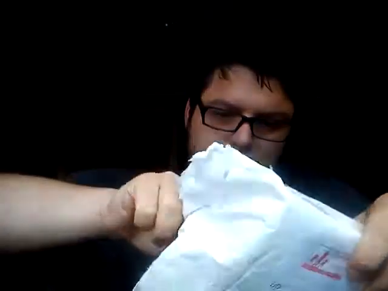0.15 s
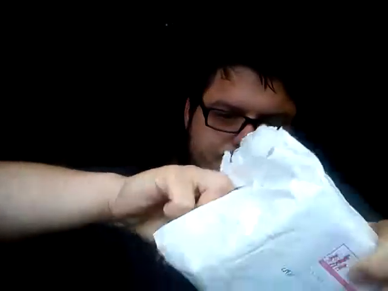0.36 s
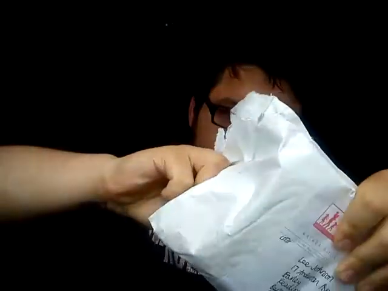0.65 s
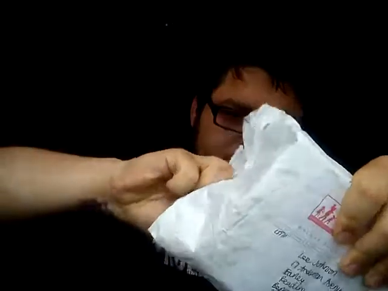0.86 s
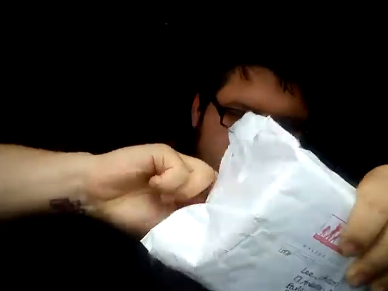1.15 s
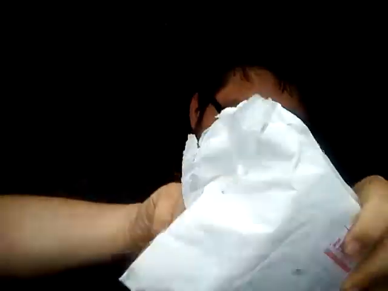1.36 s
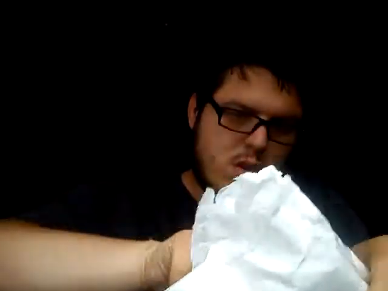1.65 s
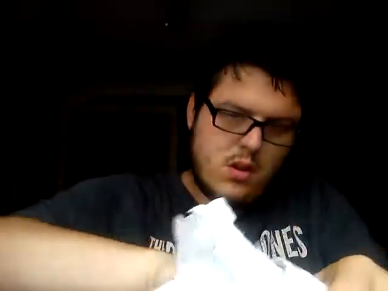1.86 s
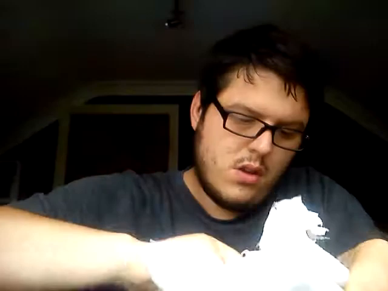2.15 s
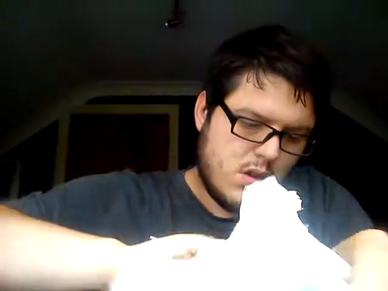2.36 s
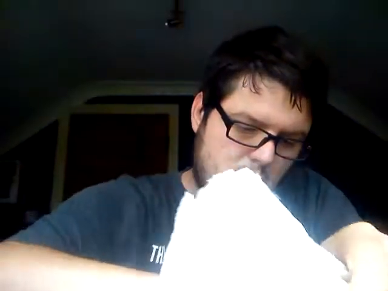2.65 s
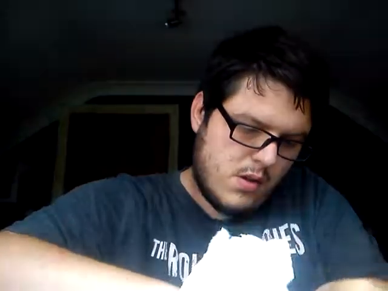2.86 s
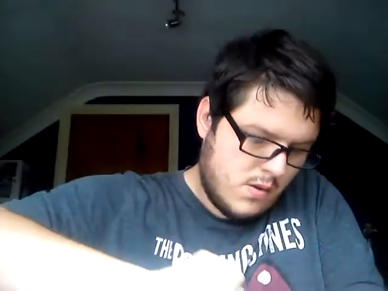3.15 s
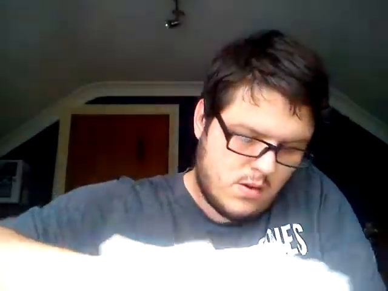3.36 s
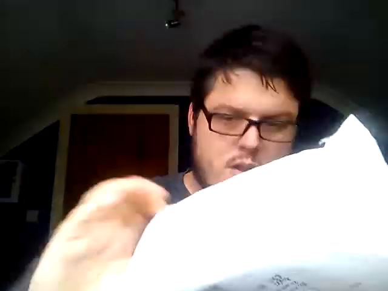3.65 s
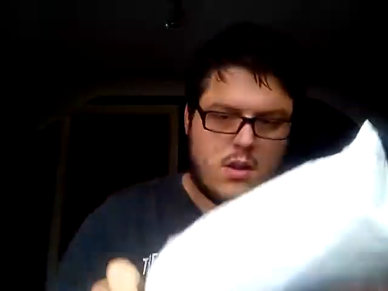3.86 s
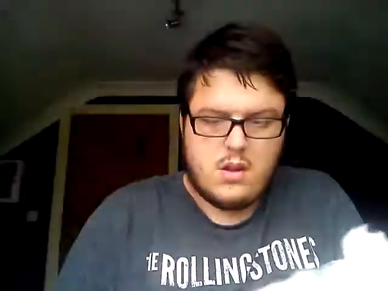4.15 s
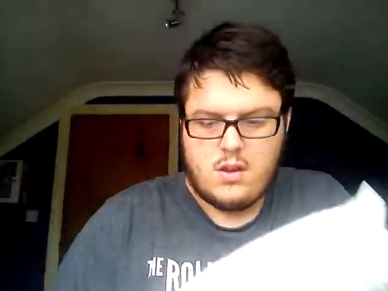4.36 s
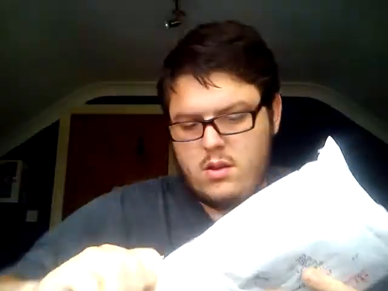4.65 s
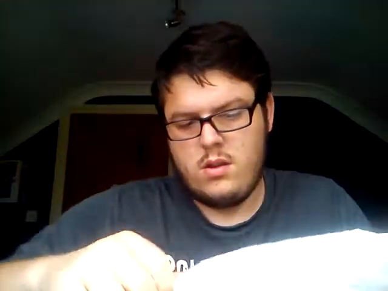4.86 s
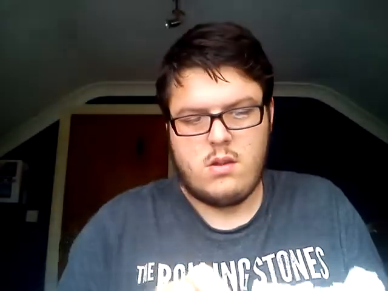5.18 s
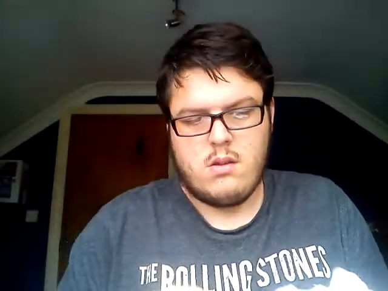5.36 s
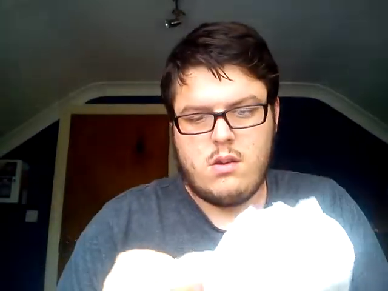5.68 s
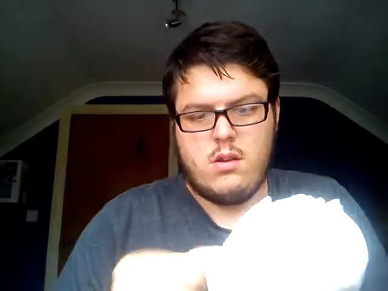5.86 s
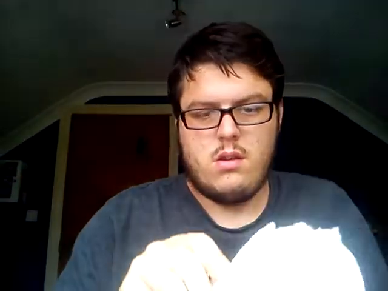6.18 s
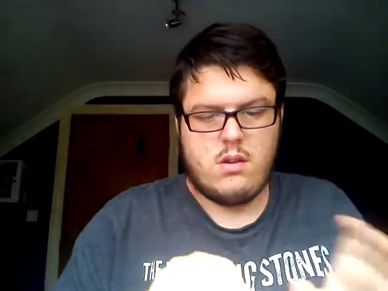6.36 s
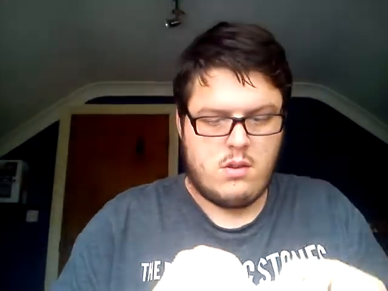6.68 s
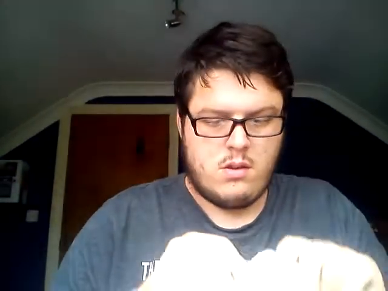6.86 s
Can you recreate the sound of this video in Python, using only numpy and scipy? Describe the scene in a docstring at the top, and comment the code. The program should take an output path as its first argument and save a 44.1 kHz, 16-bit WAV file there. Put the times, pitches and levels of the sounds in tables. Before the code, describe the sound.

A stiff paper envelope is handled and torn very close to a small microphone in a small, fairly dry room with a faint low noise bed. From 0 s, sheets slide and crinkle in short uneven strokes, bright fibre hiss over a hollow pouch-like rustle. A short jerky rip at 0.8 s brings a couple of pops; a firmer snap follows at 1.3 s. From 1.9 s a rip grows, ending in two loud, almost joined snaps at 2.1 s. Busy rustling with small crackles and soft low bumps fills 2.3 to 4.3 s. Two tiny rips at 4.5 s crackle sharply. Looser crumpling continues, with a dull bump at 5.5 s, and gets sparse and quiet after 6.2 s. At 6.9 s a hard tug releases a rapid cluster of the loudest snaps, within about a tenth of a second, then the hands settle.

```python
"""Hands tear open a stiff paper envelope close to a small microphone in a small room, over a low background noise.
From the start, sheets slide by stick and slip: noise grains coloured by the paper and by the hollow pouch.
Creases buckle throughout, each with a burst of fibre cracks and a damped pop; soft bumps are low decaying sines.
Short rips, jerky friction on taut paper, come early, then before a pair of loud snaps, then twice in mid-scene.
A last hard tug sets off a quick run of loud snaps, and the hands come to rest."""
import sys
import numpy as np
from scipy import signal
from scipy.fft import rfft, irfft
from scipy.io import wavfile

SR = 44100
rng = np.random.default_rng(int(sys.argv[2]) if len(sys.argv) > 2 else 0)


def waveform_to_disk(signal):
    """Save audio, clipped to [-1, 1], as 16-bit WAV at the path in sys.argv[1]."""
    frames = np.transpose(np.atleast_2d(signal))
    scaled = np.clip(frames, -1, 1) * 32767
    samples = np.round(scaled).astype(np.int16)
    wavfile.write(sys.argv[1], SR, samples)


N = 309582


def from_db(db):
    """Decibel law: 20 dB is a tenfold amplitude."""
    return 10 ** (np.asarray(db) / 20)


def rms_one(x):
    """Normalisation to unit root-mean-square amplitude."""
    return x / np.sqrt(np.mean(x ** 2) + 1e-20)


def at_hz(points, hz):
    """Interpolation of a table along a logarithmic frequency axis."""
    table = np.array(points)
    return np.interp(np.log(np.maximum(hz, 1)), np.log(table[:, 0]), table[:, 1])


def over_time(points, t):
    """Linear interpolation of a table along time."""
    return np.interp(t, *np.transpose(points))


def cut(x, hz, kind, order=2):
    """Butterworth filtering: a maximally flat passband."""
    sections = signal.butter(order, hz, kind, fs=SR, output="sos")
    return signal.sosfilt(sections, x + 1e-18)


def colour(x, spectrum, size=4096):
    """Minimum-phase filtering: a folded cepstrum gives the spectrum with nothing sounding early."""
    bins_hz = np.arange(size // 2 + 1) * SR / size
    cepstrum = irfft(np.log(from_db(at_hz(spectrum, bins_hz))))
    cepstrum[1:size // 2] *= 2
    cepstrum[size // 2 + 1:] = 0
    impulse = irfft(np.exp(rfft(cepstrum)))
    return signal.fftconvolve(x, impulse)[:len(x)]


def drift(rate):
    """Band-limited chance: interpolated random values, `rate` new ones a second, with unit RMS."""
    steps = rng.standard_normal(N // 8)
    return rms_one(np.interp(np.arange(N) / SR * rate, np.arange(len(steps)), steps))


def grains(per_s, spread_db):
    """Shot noise: random clicks of either sign, many small and a few large."""
    sizes = from_db(spread_db * np.minimum(rng.exponential(1, N), 3)) * rng.choice([-1, 1], N)
    return rms_one(sizes * (rng.random(N) < per_s / SR))


def add(out, s, sound):
    """Superposition of a sound onto the output from time s."""
    start = int(s * SR)
    out[start:start + len(sound)] += sound[:N - start]


# background noise spectrum: (frequency [Hz], relative density [dB per Hz])
FLOOR = [(20, -52), (45, -1), (75, -3.5), (130, -2.5), (200, -6.5), (400, -21.5), (950, -7.5), (1600, -28),
         (4000, -24.5), (16000, -33)]


def background(level_db=-60.5):
    """Stationary noise: Gaussian noise shaped by a fixed spectrum."""
    return from_db(level_db) * rms_one(colour(rng.standard_normal(N), FLOOR))


# reverberation time of the room: (frequency [Hz], decay by 60 dB [s])
ROOM = [(150, 0.31), (500, 0.25), (2000, 0.13), (6000, 0.14), (16000, 0.096)]


def room(x, wet_db=-14.0, first_s=0.0042, size=16384):
    """Reverberation: reflections from the desk and near walls decay exponentially, each octave at its own rate."""
    t, tail = np.arange(size) / SR, 0
    white = rng.standard_normal((2, size))
    edges_hz = 75 * 2. ** np.arange(9)
    for k, (low, high) in enumerate(zip(edges_hz, edges_hz[1:])):
        decay = from_db(-60 * t / at_hz(ROOM, np.sqrt(low * high)))
        tail = tail + cut(white[k % 2], [low, high], "band") * decay  # neighbouring octaves use separate noise
    tail = tail * np.clip(t / first_s - 1, 0, 1)  # silent until the first reflection
    return x + from_db(wet_db) * signal.fftconvolve(x, rms_one(tail) / np.sqrt(size))[:N]


# soft bumps of hands and packet: (time [s], envelope peak [dB], frequency [Hz])
BUMPS = [(0.471, -49, 157), (1.316, -34.5, 221), (1.336, -47, 90.5), (1.463, -47, 205),
         (2.101, -50.5, 70.4), (2.517, -46, 150), (2.607, -44, 93), (3.032, -44, 150), (5.515, -36, 205),
         (6.669, -50.5, 169)]


def bumps(swell_s=0.0045, size=6000):
    """Damped oscillation: a soft contact swells and dies in a few low cycles."""
    out, t = np.zeros(N), np.arange(size) / SR
    envelope = t / swell_s * np.exp(1 - t / swell_s)
    for s, db, hz in BUMPS:
        add(out, s, from_db(db) * envelope * np.sin(2 * np.pi * hz * t))
    return out


def gesture(t, start, length, attack_s, release_s, build_db=0):
    """Exponential onset and release: a movement takes hold, changes by build_db to its end, then lets go."""
    since = np.maximum(t - start, 0)
    hold = from_db(build_db * (np.minimum(since / length, 1) - 1))
    release = np.exp(-np.maximum(since - length, 0) / release_s)
    return (1 - np.exp(-since / attack_s)) * hold * release


# All friction and flexing levels below are relative; brightness is fibre hiss over sheet rasp.
# the envelope stirs even when merely held, until the hands come to rest: (time [s], friction [dB])
HELD = [(0, -59), (1.1, -62), (2.3, -59.5), (4.1, -65.5), (5, -62), (6.3, -61.5), (6.5, -71), (7, -74)]
# sheet sliding on sheet: (start [s], length [s], friction [dB], brightness [dB], flexing [dB])
STROKES = [(0.07, 0.18, -55, 7, -60), (0.225, 0.12, -52, 4, -57), (0.376, 0.12, -52, 7.5, -60),
           (0.535, 0.1, -49.5, 2.5, -50), (0.645, 0.21, -55.5, 4, -70), (1.158, 0.14, -53.5, 8, -53.5),
           (1.305, 0.037, -48.5, 6, -44.5), (1.446, 0.089, -55, 10, -57.5), (1.585, 0.025, -52, -2, -49),
           (1.748, 0.056, -50, 3, -48), (1.812, 0.035, -41, -0.5, -41.5), (2.34, 0.12, -53, 4.5, -54.5),
           (2.5, .025, -48, 1, -58), (2.594, 0.11, -44.5, -1.5, -43), (2.733, .11, -49.5, 3.5, -52.5),
           (2.851, 0.025, -40.5, 4, -43), (2.917, 0.062, -47, 11, -50), (3.01, .05, -42, 3, -43),
           (3.081, 0.084, -50.5, 1, -55), (3.175, 0.043, -46.5, -5.5, -46.5), (3.24, 0.36, -54, 6, -61),
           (3.564, 0.14, -52, 0.5, -51), (3.801, 0.037, -59, 6, -55), (3.899, .15, -53.5, 6.5, -56),
           (4.127, 0.11, -50.5, 2.5, -52.5), (4.256, 0.21, -52.5, 4, -56), (4.43, .025, -40, 11, -47),
           (4.643, 0.088, -53, 4, -52), (4.78, 0.11, -55.5, 3.5, -61), (5.136, .16, -53.5, 0.5, -52.5),
           (5.3, 0.18, -58, 9, -65), (5.432, 0.23, -45.5, 2.5, -44.5), (5.67, 0.099, -49.5, 8, -47),
           (5.764, 0.17, -54, 2, -56), (5.955, 0.23, -58, 4, -56), (6.197, 0.049, -51.5, 1.5, -50.5),
           (6.278, 0.035, -62, -7, -60), (6.585, 0.18, -64.5, 8, -62), (6.708, 0.2, -52.5, 5, -56.5)]
# rips: (start [s], length [s], final friction [dB], brightness [dB], final flexing [dB], build-up [dB])
RIPS = [(0.787, 0.16, -38, 3, -36, 7), (1.873, 0.24, -34.5, 4.5, -36, 12), (4.472, 0.024, -36.5, 6, -43, 1),
        (4.531, 0.046, -32.5, 4, -35.5, 0), (6.899, 0.063, -29.5, 2, -36, -1)]


def hands(size=7000):
    """Power addition of holding, strokes and rips: friction, brightness and flexing in dB, and the share of ripping."""
    t = np.linspace(0, N / SR, size)
    # each movement: (shape, friction dB, brightness dB, flexing dB)
    movements = [(from_db(over_time(HELD, t)), 0, 5, -2)]
    for start, length, *levels in STROKES:
        movements.append((gesture(t, start, length, 0.012, 0.031), *levels))
    for start, length, *levels, build_db in RIPS:
        movements.append((gesture(t, start, length, 0.0094, 0.037, build_db), *levels))
    shapes, friction_db, bright_db, flex_db = map(np.array, zip(*movements))
    friction = (shapes * from_db(friction_db)[:, None]) ** 2
    total = friction.sum(axis=0)
    shares = friction / total
    flexing = from_db(flex_db) ** 2 @ shapes ** 2
    ripping = shares[-len(RIPS):].sum(axis=0)
    controls = 10 * np.log10(total), bright_db @ shares, 10 * np.log10(flexing), ripping
    return [np.interp(np.arange(N) / SR, t, control) for control in controls]


# colour of rubbing and cracking paper: (frequency [Hz], relative level [dB])
PAPER = [(500, -30), (1100, 3.5), (1550, -4.5), (2000, 2), (2850, 2), (3500, -6), (4200, -6.5),
         (4900, -0.5), (5600, 0.5), (6500, -3.5), (8000, 0), (10000, -2.5), (13000, -3.5), (16000, -10)]


def paper(drive, bright_db, split_hz=4300):
    """Spectral balance: the sheet rasps below the split, fibres hiss above; brightness shares out the power."""
    sound = colour(drive, PAPER)
    rasp = rms_one(cut(sound, split_hz, "low", order=4))
    hiss = rms_one(cut(sound, split_hz, "high", order=4))
    return (rasp + from_db(bright_db) * hiss) / np.sqrt(1 + from_db(bright_db) ** 2)


# resonances of the pouch: (frequency [Hz], bandwidth [Hz], relative level [dB])
POUCH = [(262, 68, 4.5), (342, 72, 5.5), (455, 128, 1), (567, 148, -1), (792, 98, -3), (986, 87, -4.5),
         (1302, 450, -10.5)]


def pouch(drive, slack_db=0):
    """Modal resonance of the envelope and the air in it; slack, in dB per octave, favours the low modes."""
    out, power = 0, 0
    for k, (hz, width_hz, db) in enumerate(POUCH):
        r = np.exp(-np.pi * width_hz / SR)  # pole radius
        top = (1 - r * r) / 2 * np.array([1, 0, -1])
        bottom = [1, -2 * r * np.cos(2 * np.pi * hz / SR), r * r]
        gain = from_db(db - slack_db * np.log2(hz / 500))
        out = out + (-1) ** k * gain * signal.lfilter(top, bottom, drive)
        power = power + gain ** 2 * width_hz
    return rms_one(cut(out / np.sqrt(power), [170, 1800], "band"))


def crinkles(per_s=40, spread_db=8.0, crumble_s=0.00045, count=6, size=200):
    """Crackling noise: tiny creases give way at random, each crumbling in its own way; pushes and their crackle."""
    pushes, crackle = 0, 0
    for _ in range(count):
        clicks = grains(per_s, spread_db)
        crumble = rng.standard_normal(size) * np.exp(-np.arange(size) / SR / crumble_s)
        pushes = pushes + clicks
        crackle = crackle + signal.oaconvolve(clicks, crumble)[:N]
    return rms_one(pushes), rms_one(crackle)


# slack paper booms low, taut paper rings higher: (time [s], tilt towards low resonances [dB per octave])
SLACK = [(0, -3.5), (1.9, -2.5), (2.15, -7.5), (2.35, -2), (2.65, -4.5), (3.6, -1), (4.6, -3.5),
         (5.1, -0.5), (6.7, -0.5), (6.95, 4)]


def rustle(rub_db=-1.3, crinkle_db=-8.0, flex_db=-1.0, slip_db=1.87, rip_slip_db=1.5):
    """Stick-slip friction: sheets rub and crinkle, a rip goes in jerks, and the same slips shake the pouch."""
    t = np.arange(N) / SR
    friction_db, bright_db, bend_db, ripping = hands()
    sliding_grip = rms_one(from_db(slip_db * drift(120)))
    ripping_grip = rms_one(from_db(rip_slip_db * drift(300)))
    grip = (1 - ripping) * sliding_grip + ripping * ripping_grip
    rub = grains(14000, 1.74) * grip
    pushes, crackle = crinkles()
    loose = 1 - .5 * ripping  # taut paper crinkles less
    treble = paper(from_db(rub_db) * rub + from_db(crinkle_db) * loose * crackle, bright_db)
    shaking = grains(900, 4.5) * grip + 0.87 * loose * pushes
    body = pouch(shaking, over_time(SLACK, t))
    return from_db(friction_db) * treble + from_db(bend_db + flex_db) * body


def small_folds(per_s=7, crack_over_db=4.0, pop_over_db=7.5, spread_db=1.5, bright_db=-1.0,
                bright_spread_db=13.0, pop_hz=590, pitch_octaves=0.63, count=150):
    """Poisson process: lesser creases buckle as strongly as the hands work, except on taut paper; rows as in SNAPS."""
    friction_db, _, flex_db, ripping = hands()
    times = np.cumsum(rng.exponential(1 / per_s, count))
    rows = []
    for s, (strength, edge, depth, pitch) in zip(times, rng.standard_normal((count, 4))):
        i = int(s * SR)
        if i < N and ripping[i] < .5:
            crack = friction_db[i] + crack_over_db + spread_db * strength
            bright = bright_db + bright_spread_db * edge
            pop = flex_db[i] + pop_over_db + spread_db * depth
            rows.append((s, crack, bright, pop, pop_hz * 2 ** (pitch_octaves * pitch)))
    return rows


# creases that buckle:
# (time [s], relative crack level [dB], brightness [dB], relative pop level [dB], pop frequency [Hz])
SNAPS = [(0.2803, -36, 0.5, -60, 736), (0.4733, -45.5, -7, -39, 398), (0.6977, -44, -10, -48, 517),
         (0.8313, -31.5, -10, -23.5, 835), (0.8515, -33, 6, -50, 770), (0.971, -54, 2, -36, 590),
         (1.3151, -31.5, 4, -26.5, 700), (1.4571, -52, -16, -42, 368), (1.6082, -44, 5, -40, 370),
         (1.768, -38, -23, -48, 960), (1.841, -36.5, -4, -32, 596), (2.0921, -22, 9.5, -14.5, 810),
         (2.0968, -21.5, 1.5, -29, 825), (2.1185, -30.5, -10, -22.5, 800), (2.4265, -43, 11, -56, 720),
         (2.4788, -65.7, 2, -42.5, 507), (2.525, -41, 1, -51, 570), (2.8296, -37.5, -21, -42, 890),
         (2.8592, -28.5, -1, -35, 700), (3.0308, -39.5, 4, -34, 740), (3.0395, -39, -5, -32.5, 675),
         (3.4602, -51, -9, -37.5, 695), (3.6771, -41, 2, -67, 595), (3.98, -44, 2, -60, 800),
         (4.3538, -57, -4, -32.5, 393), (4.3732, -44, -4, -35.5, 586), (4.445, -29, 7.5, -43.5, 795),
         (4.474, -27.5, 9, -34.5, 890), (4.4805, -36, 3, -39, 800), (4.5734, -27.5, 4, -26.5, 527),
         (4.594, -30, -7, -27.5, 487), (4.6264, -31, 20, -35.5, 624), (4.6642, -40.5, -1, -44, 600),
         (4.7736, -49, 3, -67, 800), (5.14, -45.5, -2, -46.5, 700), (5.5046, -34.5, -9, -35, 600),
         (5.5196, -46.3, 6, -34, 333), (5.6184, -33.5, 5.5, -39, 540), (5.8448, -37.5, 30, -53, 556),
         (5.8994, -44, -12, -66, 720), (6.0498, -37.5, 3, -35.5, 456), (6.224, -42, 20, -71, 580),
         (6.2979, -47, -11, -42.5, 554), (6.598, -53, -10, -46, 370), (6.785, -44.5, -16, -41, 470),
         (6.9071, -28.5, 2, -30, 680), (6.9157, -23, 11, -41, 595), (6.9231, -21.5, 11, -27, 570),
         (6.9271, -20, 10, -44, 600), (6.9319, -28, 18.5, -30, 440), (6.9349, -17, 2.5, -14.5, 420),
         (6.938, -17.5, 16.5, -17, 505), (6.9437, -17, 9, -14, 513), (6.949, -16, 13, -34, 507),
         (6.9607, -21.5, 2, -17, 474), (6.9698, -18, 3.5, -42, 600)]


def snaps(creases, pop_gain_db=-1.0, crack_s=0.00063, facet_db=3.0,
          edge_db=2.0, pop_cycles=0.9, pouch_share=0.7, size=2048):
    """Buckling instability: a crease bursts in fibre cracks and settles; the freed panel swings and rings the pouch."""
    out, t = np.zeros(N), np.arange(size) / SR
    to_level = np.sqrt(.004 * SR / size)  # levels count the energy of a snap over 4 ms
    settling = .11 * np.exp(-t / .006)  # the fold creaks on faintly for a few ms
    release = (1 - np.exp(-t / 0.00087)) * (np.exp(-t / crack_s) + settling)
    facet_hz = np.geomspace(1000, 16000, 14)
    top_octave = np.maximum(np.log2(facet_hz / 8000), 0)
    for s, crack_db, bright_db, pop_db, pop_hz in creases:
        fibres, push = rng.standard_normal((2, size))
        # each fold has its own colour, and a crack reaches higher than a rub
        facet_levels = facet_db * rng.standard_normal(len(facet_hz)) + edge_db * top_octave
        facet = np.column_stack([facet_hz, facet_levels])
        crack = paper(colour(fibres * release, facet, size=512), bright_db)
        swing = np.sin(2 * np.pi * pop_hz * t) * np.exp(-t * pop_hz / pop_cycles)
        swing = rms_one(cut(swing, [pop_hz / 2.2, pop_hz * 1.82], "band"))
        ringing = pouch(push * np.exp(-t / 0.0028))
        hollow = rms_one(cut(ringing, [pop_hz / 1.41, pop_hz * 1.78], "band"))  # modes near its pitch
        pop = rms_one(swing + pouch_share * hollow)
        add(out, s, to_level * (from_db(crack_db) * crack + from_db(pop_db + pop_gain_db) * pop))
    return out


def scene():
    """Superposition: paper and hands sound in the room over the background; one microphone feeds both channels."""
    envelope = rustle() + snaps(small_folds()) + snaps(SNAPS)
    sound = room(envelope + bumps()) + background()
    return np.array([sound, sound])


def record(dry):
    """Soft saturation and band limiting: the loudest peaks are rounded and the top is cut at 16.1 kHz."""
    low_pass = signal.ellip(10, .1, 70, 16100, fs=SR, output="sos")
    return signal.sosfilt(low_pass, np.tanh(dry))


dry = scene()
out = record(dry)
waveform_to_disk(out)
```